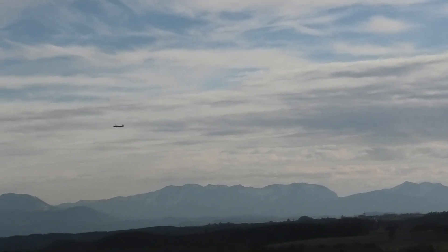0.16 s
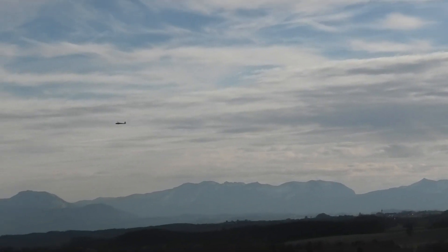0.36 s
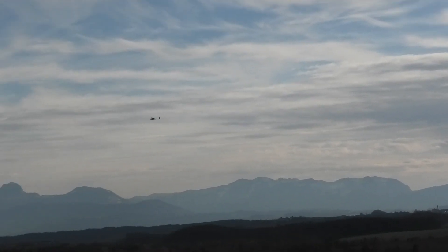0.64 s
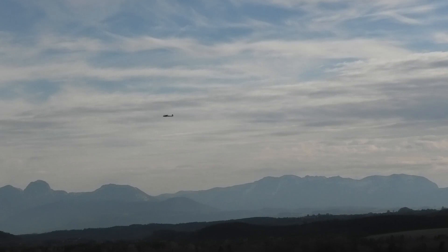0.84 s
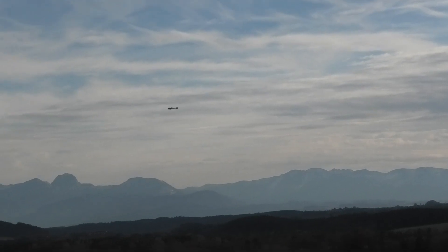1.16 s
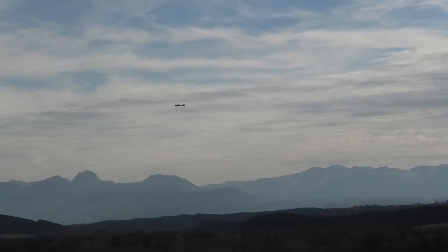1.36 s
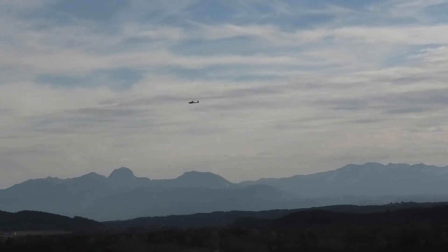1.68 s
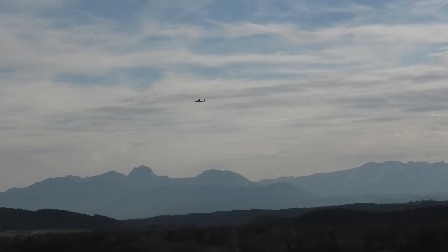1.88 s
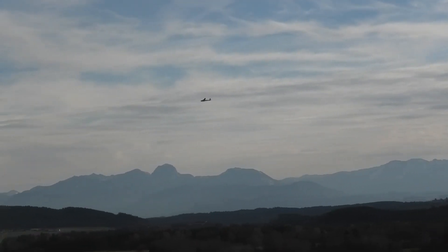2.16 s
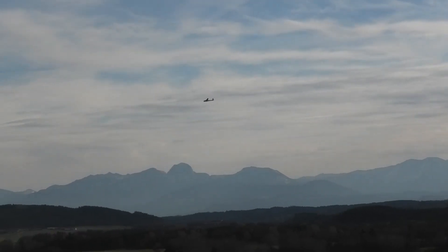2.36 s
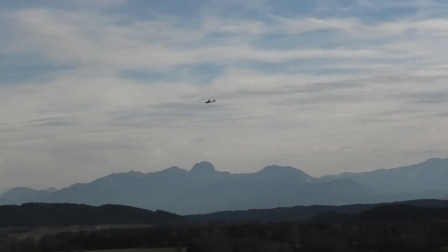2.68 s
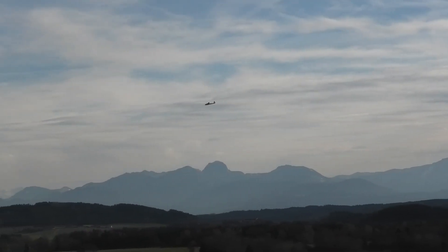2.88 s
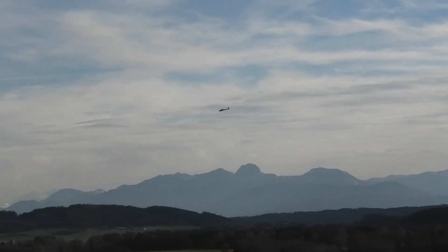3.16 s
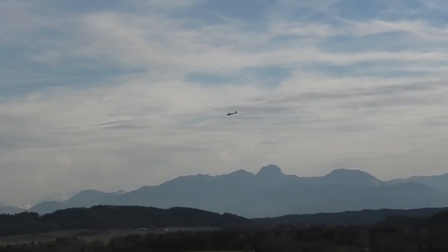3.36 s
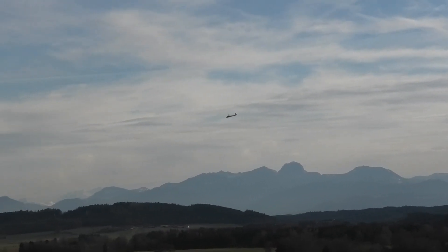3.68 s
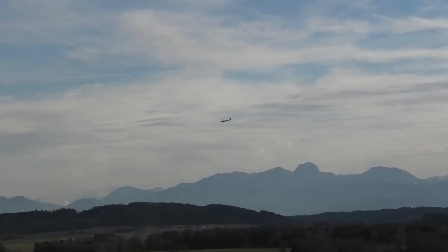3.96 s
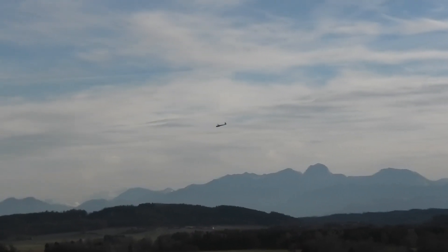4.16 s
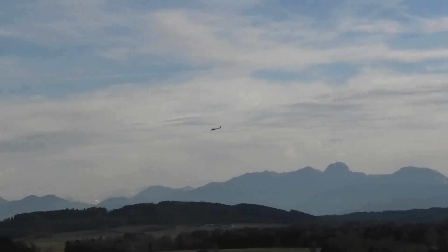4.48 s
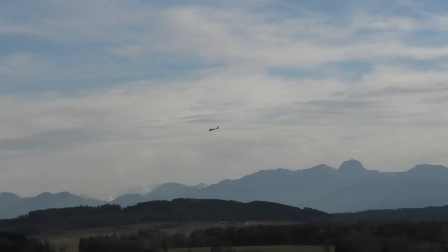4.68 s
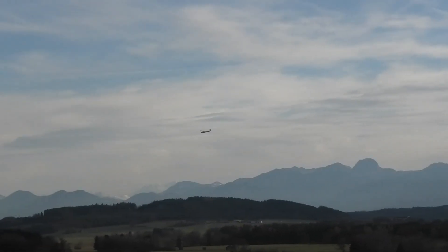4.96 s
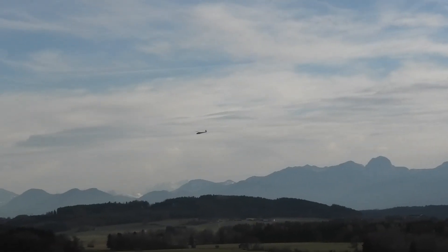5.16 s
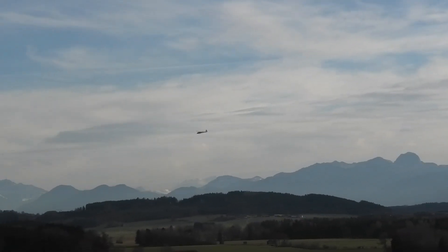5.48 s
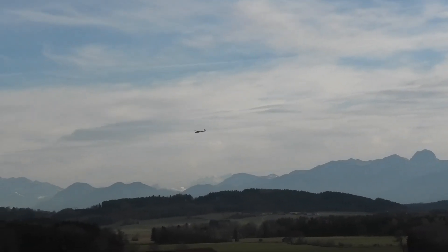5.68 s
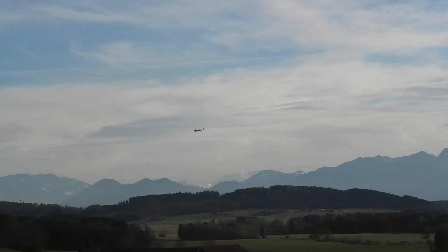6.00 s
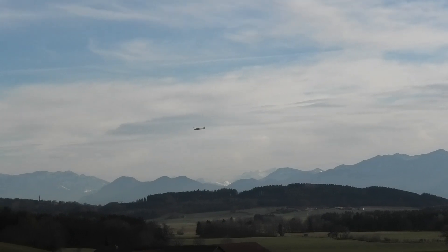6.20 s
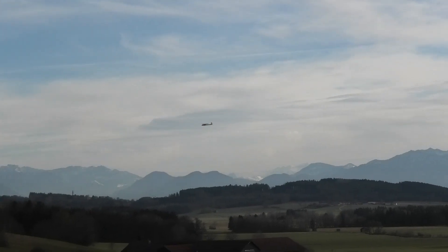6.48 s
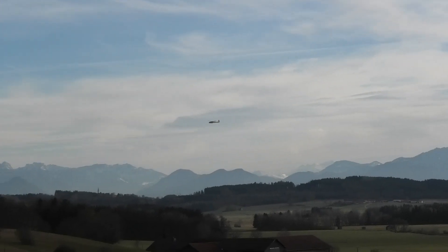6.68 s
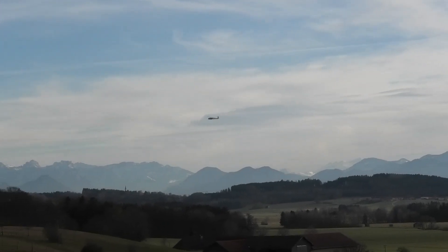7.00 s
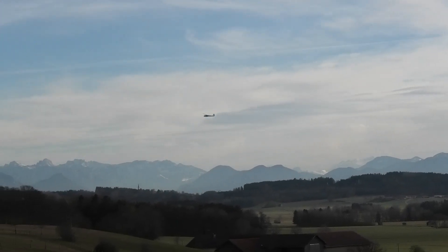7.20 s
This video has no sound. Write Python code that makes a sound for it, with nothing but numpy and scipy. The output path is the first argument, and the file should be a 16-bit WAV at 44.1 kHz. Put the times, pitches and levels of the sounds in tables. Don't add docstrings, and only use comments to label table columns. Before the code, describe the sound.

A heavy engine drones low across an open valley, rising slowly through two pulls with lift-offs, while birds chirp and light wind buffets the microphone.

```python
import sys
import numpy as np
from scipy import signal
from scipy.io import wavfile
from scipy.ndimage import uniform_filter1d

SR = 44100
rng = np.random.default_rng(int(sys.argv[2]) if len(sys.argv) > 2 else 0)


def rack_gain(trim_db):
    fader = np.asarray(trim_db, float)
    return 10 ** (fader / 20)


def inscribe(sig):
    pcm = np.round(np.clip(np.atleast_2d(sig).T, -1, 1) * 32767)
    wavfile.write(sys.argv[1], SR, pcm.astype(np.int16))


N = 323694
CENTRED = [(20, 0), (20000, 0)]  # pitch_hz, left_minus_right_db


def evened(x):
    return x / np.sqrt(np.mean(x ** 2) + 1e-20)


def read(points, hz, index=1):
    rows = np.transpose(points)
    return np.interp(np.log(hz + 1), np.log(rows[0] + 1), rows[index])


def curve(rows):
    return np.interp(np.arange(N) / SR, *np.transpose(rows))


def swells(rows, rest_db):
    t = np.arange(N) / SR
    bells = sum(rack_gain(db) * np.exp(-((t - s) / width) ** 2) for s, db, width in rows)
    return 20 * np.log10(rack_gain(rest_db) + bells)


def add(mix, s, sound):
    part = mix[:, round(s * SR):][:, :sound.shape[1]]
    part += sound[:, :part.shape[1]]


def sides(db):
    return rack_gain(np.multiply.outer([.5, -.5], db))


def drift(size, hz):
    coarse = size // 16 + 2
    z = rng.standard_normal(coarse) + 1j * rng.standard_normal(coarse)
    r = np.exp(-2 * np.pi * hz * 16 / SR)
    z = signal.lfilter([1], [1, -r], signal.lfilter([1], [1, -r], z))
    z = np.interp(np.arange(size) / 16, np.arange(coarse), z)
    return z / np.sqrt(np.mean(abs(z) ** 2))


def noise(spectrum, same, pan, patchy_db):
    frames, hz = N // 512 + 5, np.fft.rfftfreq(2048, 1 / SR)
    a, b, c, d, patches = rng.standard_normal((frames, 1025, 5), dtype=np.float32).T
    patches = uniform_filter1d(np.ascontiguousarray(patches), size=24, axis=0)
    patches = evened(uniform_filter1d(patches, size=22, axis=1))
    like = np.clip(read(same, hz), -1, 1)[:, None]
    left = a + 1j * b
    right = like * left + np.sqrt(1 - like ** 2) * (c + 1j * d)
    z = np.array([left, right])
    z *= rack_gain(read(spectrum, hz)[:, None] + patchy_db * patches) * sides(read(pan, hz))[:, :, None]
    return evened(signal.istft(z.astype(np.complex64), nperseg=2048, noverlap=1536)[1][:, :N])


# pitch_hz, level_db (per Hz)
HISS_TONE = [(2060, -14), (3500, -2), (5330, -9), (6430, -12), (11200, -0.5), (15100, -1), (15700, -10)]
# pitch_hz, likeness (0 to 1)
HISS_SAME = [(4000, 0.045), (5500, 0.076), (7000, 0.98), (9000, 0.79), (12000, 0.4), (15000, 0.16)]


def hiss():
    return rack_gain(-68.5) * noise(HISS_TONE, HISS_SAME, CENTRED, .1)


# pitch_hz, level_db
TONES = [(1626, -78), (3025, -90), (15649, -96)]


def tones():
    t = np.arange(N) / SR
    out = 0
    for hz, db in TONES:
        waver = 1 + 0.79 * drift(N, 5.3)
        out = out + np.sqrt(2) * rack_gain(db) * (waver * np.exp(2j * np.pi * hz * t)).real
    return out


# pitch_hz, level_db (per Hz)
WASH_TONE = [(30, -19), (80, -41), (200, -31), (330, -4.5), (480, 2), (700, -0.5), (1000, 0.5),
             (1400, -3.5), (1900, -5.5), (2500, -12), (3200, -16.5), (4500, -25.5), (6500, -31.5),
             (12000, -90)]
# pitch_hz, likeness (0 to 1)
WASH_SAME = [(60, 0.76), (130, 1), (290, 0.39), (640, 0.66), (1400, 0.51), (2200, 0.41), (3100, 0.043),
             (5000, 0.064)]
# pitch_hz, left_minus_right_db
WASH_PAN = [(60, -4), (180, 5.5), (550, 0.5), (1650, 1.5), (4970, 1), (15000, 0.0)]
# centre_s, peak_db, half_width_s
WAVES = [(.5, -71, 0.84), (2.7, -75, 0.81), (4.0, -75, 0.24), (7.0, -79.5, .3)]


def wash(roar_db):
    level_db = swells(WAVES, -57) + 0.061 * roar_db
    return rack_gain(level_db) * noise(WASH_TONE, WASH_SAME, WASH_PAN, 1.1)


# pitch_hz, level_db (per Hz)
RUMBLE_TONE = [(25, -30), (50, -2.5), (95, 5), (125, 1), (170, 1), (260, -5), (400, -13.5), (800, -47)]


def rumble(roar_db):
    return rack_gain(-51 + 0.31 * roar_db) * noise(RUMBLE_TONE, [(60, 0.99), (250, 0.56)], CENTRED, 0.63)


# centre_s, peak_db, half_width_s
TYRES = [(2.2, -73, 0.63), (4.1, -71, .2), (4.8, -63, .15), (5.5, -61.5, 0.15), (6.4, -66, .3),
         (7.1, -72, 0.37)]
# pitch_hz, level_db (per Hz)
TYRE_TONE = [(700, -35), (1150, -10.5), (1500, -1), (1850, -9), (2600, -16), (5000, -72)]


def tyres():
    return rack_gain(swells(TYRES, -80)) * noise(TYRE_TONE, [(1000, 0.5), (2000, 0.65)], WASH_PAN, 0.74)


# centre_s, peak_db, half_width_s
GUSTS = [(.45, -63, .1), (.95, -62, .25), (1.7, -60, .35), (2.4, -53.5, 0.24), (2.95, -55, 0.35),
         (3.7, -59, .1), (4.72, -59, .13), (5.25, -58, .1), (6.1, -50, 0.25), (6.5, -53, .25),
         (6.95, -50.5, 0.38)]
# pitch_hz, level_db (per Hz)
WIND_TONE = [(10, -42), (25, -20), (45, 0), (70, -1), (100, -10), (160, -19), (300, -40), (600, -70)]


def wind(wind_db):
    return rack_gain(wind_db + 3.0) * noise(WIND_TONE, [(20, -.35), (60, -.55), (200, -.2)], CENTRED, 1.0)


# pitch_hz, level_db (per Hz)
RUSTLE_TONE = [(1200, -30), (2000, 3.5), (2900, -6.5), (3600, -9), (5000, -16), (8000, -50)]


def rustle(wind_db):
    leaves_db = uniform_filter1d(wind_db - wind_db.mean(), round(.8 * SR))
    return rack_gain(-77 + 0.7 * leaves_db) * noise(RUSTLE_TONE, [(2000, .3), (4000, .1)], WASH_PAN, 1.0)


# abeam_hz, abeam_db, more_db (when end-on)
PROP_LINES = [(87.5, -56.7, -3), (175, -62.5, 12), (243, -67.5, 8)]
ABEAM_S, PASS_S, MACH = 3.7, 5.0, .11


def propeller():
    along = (np.arange(N) / SR - ABEAM_S) / PASS_S
    doppler = 1 - MACH * along / np.sqrt(1 + along ** 2)
    turn, out = 2 * np.pi * np.cumsum(doppler) / SR, 0
    for hz, db, end_db in PROP_LINES:
        flutter = 1 + 0.37 * drift(N, 4.8)
        out = out + np.sqrt(2) * rack_gain(db + end_db * along ** 2) * (flutter * np.exp(1j * hz * turn)).real
    return out


def chirp(s, db, hz, fall, length, pan_db):
    u = np.arange(0, 1.15 * length, 1 / SR) / length
    glide_hz = hz + fall * (1.1 * abs(.95 - u) ** 1.5 - .3)
    turn = 2 * np.pi * np.cumsum(glide_hz) / SR
    rough = 1 + .3 * drift(len(u), 120.0)
    note = rack_gain(db) * np.hanning(len(u)) * (rough * np.exp(1j * turn)).real
    echo = .017 * rng.standard_normal((2, 5000)) * np.exp(-np.arange(5000) / 1500)
    echo[:, 0] = 0.86
    return s, signal.fftconvolve(note[None], echo, axes=1) * sides([pan_db])


# start_s, peak_db, pitch_hz, fall_hz, length_s
LEFT_BIRD = [(1.023, -59.5, 2300, 800, .032), (1.95, -63, 2550, 450, .07), (2.05, -59.5, 2550, 750, .035),
             (2.21, -58.5, 2080, 500, .045), (2.31, -62, 2650, 500, .05), (2.428, -62, 2140, 400, .03),
             (2.72, -57, 2200, 350, .03), (2.765, -61, 2600, 500, .05), (3.1, -58, 2620, 500, .022),
             (3.112, -60, 2450, 300, .025), (3.141, -57.5, 2500, 250, .02), (5.22, -58, 2400, 350, .03),
             (6.368, -62, 2850, 400, .025)]
# start_s, peak_db, pitch_hz, fall_hz, length_s
MID_BIRD = [(2.095, -62, 1750, 400, .04), (2.83, -63, 1900, 400, .06), (2.972, -58, 2030, 500, .04),
            (3.07, -53.5, 2010, 600, .048), (3.61, -57, 1960, 350, .03), (3.948, -62, 2400, 300, .04),
            (4.052, -55.5, 2070, 650, .048), (4.275, -61.5, 2350, 350, .04), (4.361, -57.5, 2160, 500, .03),
            (4.493, -59, 2150, 400, .03), (4.952, -58, 2200, 500, .03), (5.485, -55.5, 2150, 700, .055),
            (5.876, -54, 2030, 550, .045), (6.144, -50.5, 1450, 350, .03), (6.38, -53, 2380, 700, .024),
            (6.39, -58.5, 1950, 500, .02), (6.396, -51.5, 1600, 400, .03), (6.405, -55.5, 2260, 300, .028),
            (6.428, -57, 2020, 300, .028), (6.51, -58, 2220, 250, .03), (6.799, -56, 2250, 400, .02),
            (6.953, -57, 2170, 250, .024)]
# start_s, peak_db, pitch_hz, fall_hz, length_s
COOS = [(.93, -58.5, 608, -40, .14), (1.08, -60, 572, -30, .12), (1.18, -63, 450, 0, .1),
        (5.52, -61, 505, 0, .1), (6.93, -57, 680, 0, .055)]


def birds():
    places = [(LEFT_BIRD, 8.5), (MID_BIRD, 4.2), (COOS, 1.2)]
    return [chirp(*row, pan_db) for rows, pan_db in places for row in rows]


# start_s, blow_db, tuning (factor)
KNOCKS = [
    (6.761, -35.5, 1.05),
    (6.8, -47, 1.1),
    (6.951, -62, 0.68),
]
# pitch_hz, width_hz, level_db
KNOCK_BODY = [(539, 48, 2.5), (680, 85, 6.5), (870, 80, 1), (1197, 85, 5.5), (1403, 120, 2), (1575, 50, -6),
              (2240, 450, -5)]


def knock(s, db, tuning):
    t = np.arange(0, .35, 1 / SR)
    direct, *tail = rng.standard_normal((3, len(t)))
    scuff = direct * np.minimum(t / 0.0083, 1) * np.exp(-(t / 0.032) ** 3)
    valley = rack_gain(-8) * np.array(tail) * np.exp(-t / 0.11) * np.minimum(t / 0.034, 1)
    ring = 0
    for hz, width, mode_db in KNOCK_BODY:
        decay = np.exp(-np.pi * width * t)
        ring = ring + rack_gain(mode_db) * np.sqrt(width) * decay * np.sin(2 * np.pi * hz * tuning * t)
    out = signal.fftconvolve(scuff + valley, ring[None], axes=1)[:, :len(t)]
    out = signal.sosfilt(signal.butter(4, 2600, fs=SR, output="sos"), out)
    return s, rack_gain(db) * out / abs(out).max() * sides([4.5])


# time_s, firing_hz, level_db
HUM = [(.9, 186, -84), (1.6, 191, -72), (2.1, 195, -69), (2.5, 197, -70), (2.6, 202, -72), (2.7, 219, -67),
       (2.78, 229, -66.5), (2.86, 235, -69), (2.95, 236, -84)]
# order (multiple of firing), level_db, revved_change_db
HUM_ORDERS = [(2, 1, 5.5), (3, -3, -8), (4, 1, -5), (5, .5, 2), (6, -7, -3), (7, -6, -3)]
REV_FROM_HZ, REV_SPAN_HZ = 197, 12


def hum():
    s, *columns = np.transpose(HUM)
    t = np.arange(s[0], s[-1], 1 / SR)
    hz, db = (np.interp(t, s, c) for c in columns)
    rev = np.clip((hz - REV_FROM_HZ) / REV_SPAN_HZ, 0, 1)
    turn = 2 * np.pi * np.cumsum(hz) / SR
    stack = 0
    for k, order_db, more_db in HUM_ORDERS:
        waver = 1 + 0.33 * drift(len(t), 5.1)
        stack = stack + rack_gain(order_db + rev * more_db) * (waver * np.exp(1j * k * turn)).real
    return s[0], np.sqrt(2) * rack_gain(db) * stack * sides([1.5])


COAST_S, FADE_DB_PER_S, SAG_HZ_PER_S = 0.16, 86, 8.6
OVERRUN_S, OVERRUN_FADE_DB = .45, -6


def coasting(rows):
    s, hz, db = rows[-1]
    low_db, end = db - FADE_DB_PER_S * COAST_S, COAST_S + OVERRUN_S
    dropped = (s + COAST_S, hz - SAG_HZ_PER_S * COAST_S, low_db)
    lingering = (s + end, hz - SAG_HZ_PER_S * end, low_db + OVERRUN_FADE_DB)
    return list(rows) + [dropped, lingering]


def roar():
    points = [(s, db) for rows in PULLS for s, _, db in coasting(rows)]
    effort = rack_gain(np.maximum(curve(points), -62))
    r = np.exp(-1 / (0.64 * SR))
    db = 20 * np.log10(signal.lfilter([1 - r], [1, -r], effort, zi=[effort[0]])[0])
    return db - db.mean()


# time_s, firing_hz, effort_db (level of order 2)
PULLS = [
    [(0, 57.2, -48.5), (.4, 58.73, -44), (1.0, 64.04, -42), (1.4, 67, -41.5), (1.8, 70.75, -41),
     (2.28, 75.6, -39.5), (2.41, 75.45, -36), (2.53, 74.55, -35), (2.63, 73.5, -39)],
    [(3.25, 55.07, -59), (3.55, 56.49, -49.5), (4.1, 57.58, -48), (5.14, 61.37, -44.5), (5.6, 64.3, -44.5),
     (6.2, 67.53, -44), (6.55, 69.6, -44.5), (6.73, 69.5, -40), (6.92, 69.4, -44.5)],
]
BRIGHT_DB = [-0.63, 1.5]
# order (multiple of firing), level_db (against effort at low speed), change_db_per_hz
LOWER = [(1, -4.5, 0.1), (2, 0.5, 0), (3, -3.5, -0.52), (4, -19.5, -0.0574)]
# order (multiple of firing), level_db (against order 4)
UPPER = [(5, -7), (6, -15), (7, -18), (8, -17)]
# pitch_hz, left_minus_right_db, left_lead_radians
ORDER_PAN = [(59.5, 0, 0.054), (137, 0, -0.28), (199, 0.5, -0.4), (260, -6, -0.65), (350, -4.5, -1.2)]
LOW_SPEED_HZ = 60
UNEVEN_DB, UNEVEN_HZ = -26, 22.6
PIPE_HZ, PIPE_WIDTH_HZ, PIPE_DB = 278, 18.3, 6.5


def pull(rows, bright_db):
    s, *columns = np.transpose(coasting(rows))
    t = np.arange(s[0], s[-1], 1 / SR)
    hz, effort_db = (np.interp(t, s, c) for c in columns)
    faster_hz = hz - LOW_SPEED_HZ
    levels = [effort_db + db + slope * faster_hz + bright_db * (k > 2) for k, db, slope in LOWER]
    levels[-1] = levels[-1] + PIPE_DB / (1 + ((len(LOWER) * hz - PIPE_HZ) / PIPE_WIDTH_HZ) ** 2)
    levels += [levels[-1] + db for _, db in UPPER]
    turn, out = 2 * np.pi * np.cumsum(hz) / SR, 0
    for k, db in enumerate(levels, 1):
        uneven = 1 + rack_gain(UNEVEN_DB) * drift(len(t), UNEVEN_HZ)
        lead = np.multiply.outer([.5, -.5], read(ORDER_PAN, k * hz, index=2))
        pipe = 2.5 - .09 * faster_hz + 1.9 * max(k - 2.85, 0)
        line = uneven * np.exp(1j * (k * turn + pipe + lead))
        out = out + np.sqrt(2) * rack_gain(db) * sides(read(ORDER_PAN, k * hz)) * line.real
    fade_in_s = t - s[0] + 0.11 * (s[0] == 0)
    return s[0], out * np.minimum(1, np.minimum(fade_in_s, s[-1] - t) / 0.047)


def scene():
    roar_db, wind_db = roar(), swells(GUSTS, -74)
    mix = hiss() + tones()
    mix += wash(roar_db) + rumble(roar_db) + tyres()
    mix += wind(wind_db) + rustle(wind_db)
    mix += propeller()
    for sound in birds():
        add(mix, *sound)
    for row in KNOCKS:
        add(mix, *knock(*row))
    add(mix, *hum())
    for rows, bright_db in zip(PULLS, BRIGHT_DB):
        add(mix, *pull(rows, bright_db))
    return mix


def roll_off(x):
    return signal.sosfilt(signal.butter(12, 15820, fs=SR, output="sos"), x)


def record(dry):
    return roll_off(dry)


dry = scene()
out = record(dry)
inscribe(out)
```